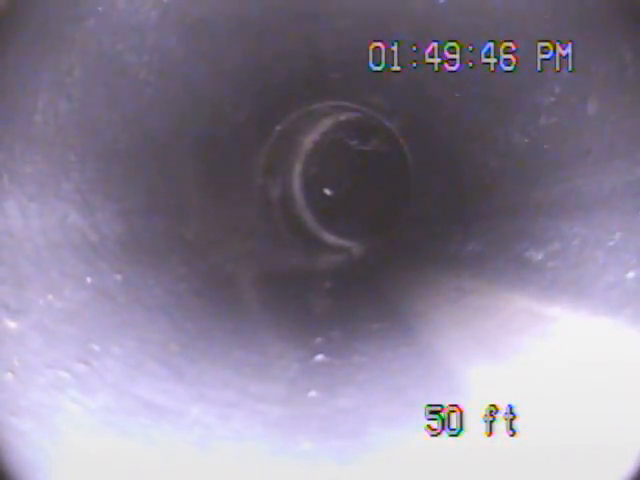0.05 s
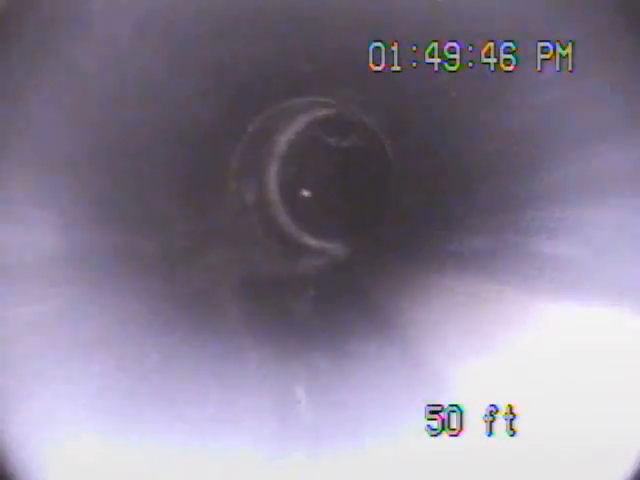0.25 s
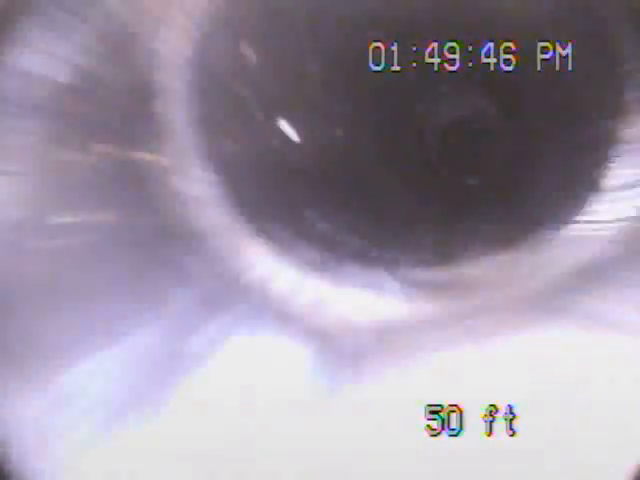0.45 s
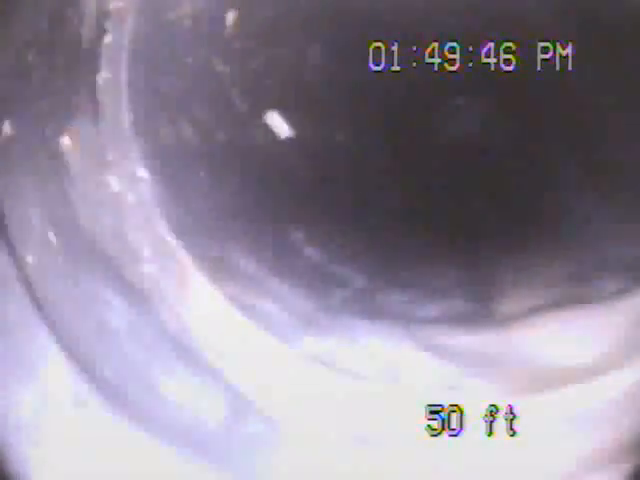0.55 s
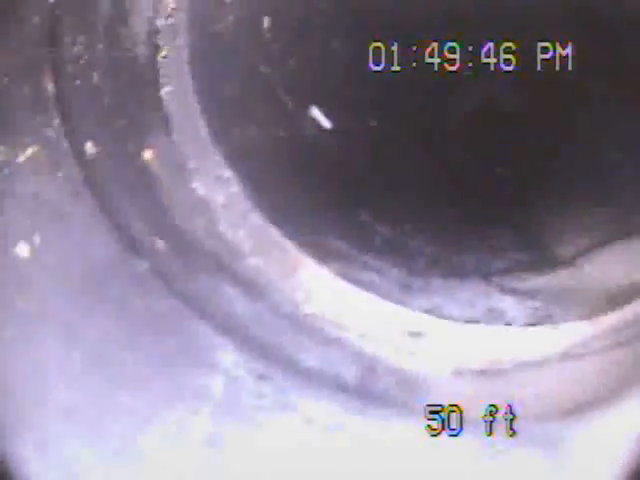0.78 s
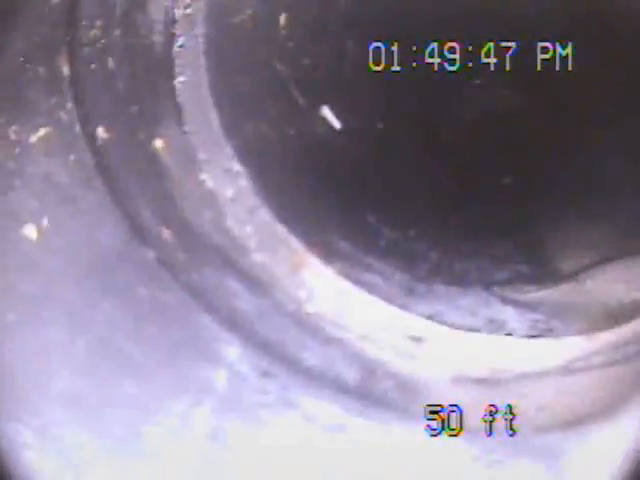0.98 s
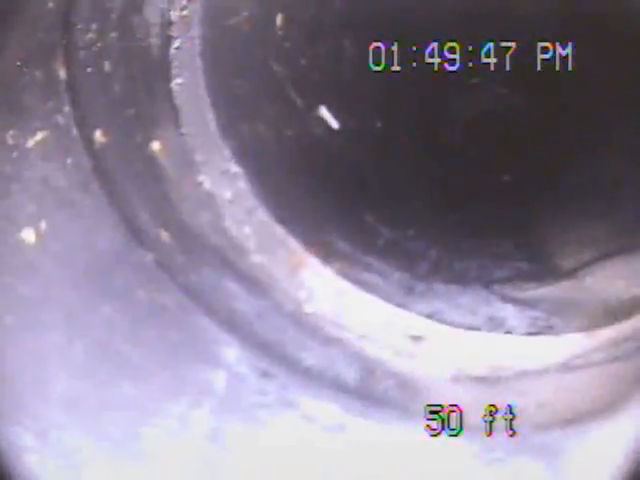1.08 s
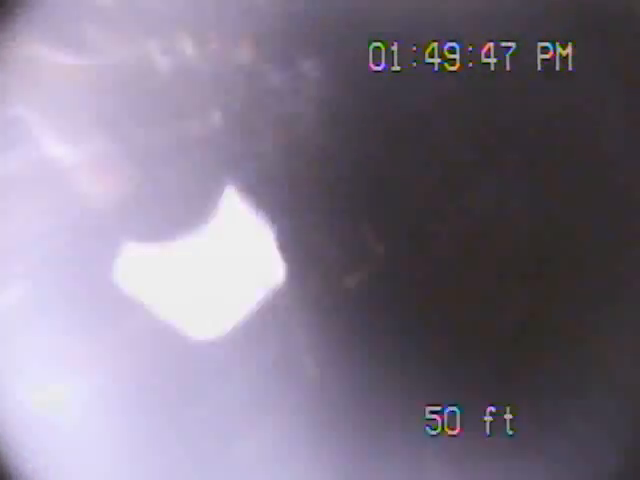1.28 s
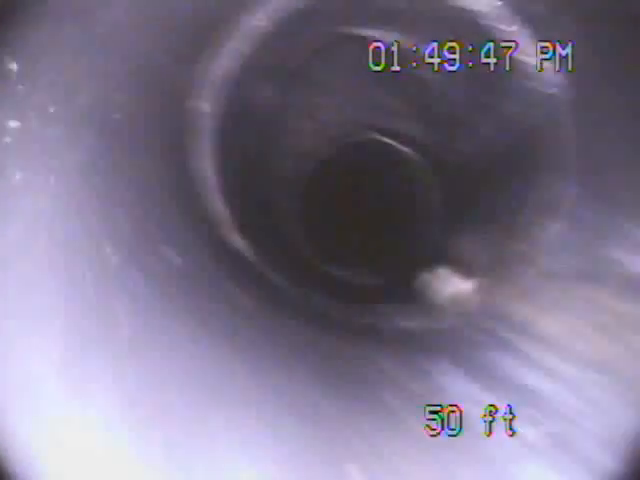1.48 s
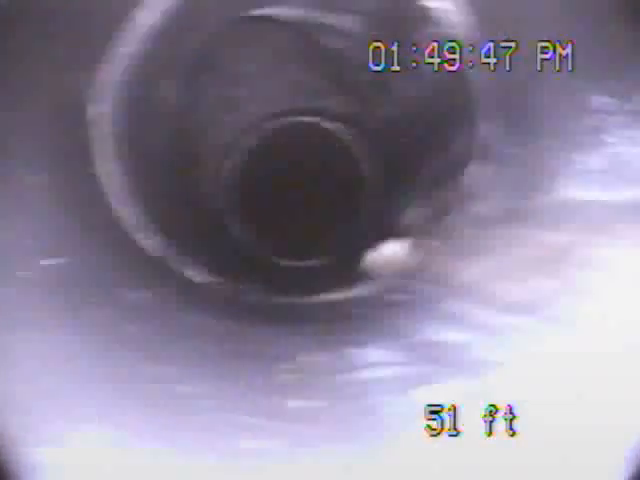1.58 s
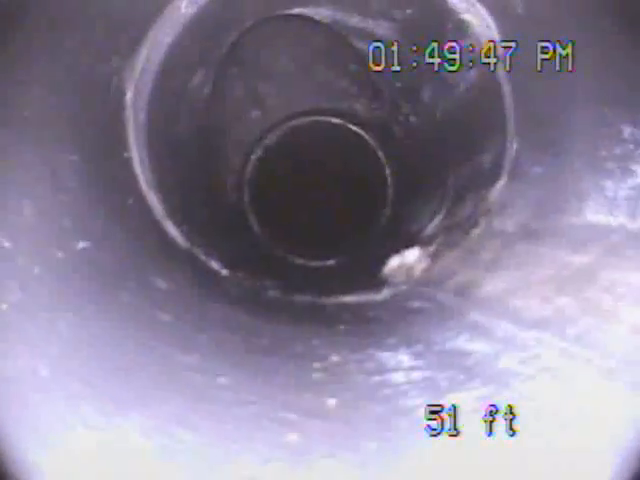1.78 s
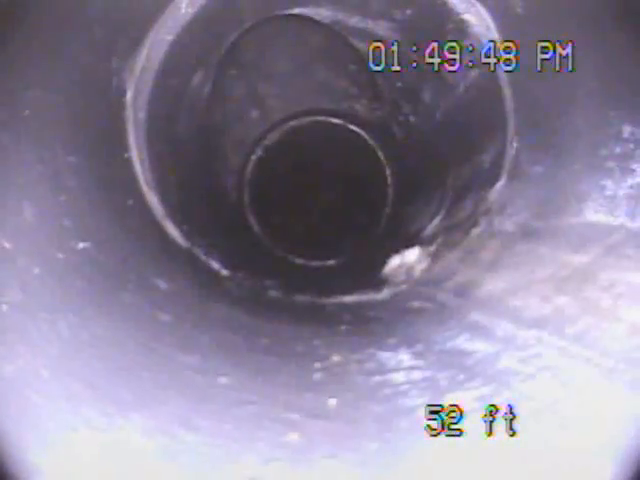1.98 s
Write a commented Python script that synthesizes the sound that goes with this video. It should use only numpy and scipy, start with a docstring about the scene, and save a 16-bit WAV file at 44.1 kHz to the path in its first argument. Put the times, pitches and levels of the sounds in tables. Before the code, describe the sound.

A springy cable slaps against its steel reel in uneven bursts, leaving the bars ringing briefly. Between the slaps, close to the microphone, it hisses into a drain while the reel rumbles and knocks over a faint room drone.

```python
"""Hiss and light metal slaps, close to a stereo microphone: a springy push cable is fed by hand
from its steel reel down a drain. Each slap on the cage chirps downward, as waves spread in the
coil, and leaves the bars ringing. The reel rumbles, with a few dull knocks, and a low thump sits
under the hardest slap. Behind it are room air, a low drone and a monitor's faint whine.
The hardest slaps overload the recorder."""
import sys
import numpy as np
from scipy import signal
from scipy.fft import rfft, irfft
from scipy.io import wavfile

SR = 44100
rng = np.random.default_rng(int(sys.argv[2]) if len(sys.argv) > 2 else 0)


def dump_mix(stems):
    """Bounce the given channels to the path in sys.argv[1] as a 16-bit WAV at rate SR."""
    frames = np.atleast_2d(stems).T  # one column per channel
    limited = np.clip(frames, -1, 1)  # hard clip at full scale
    pcm = np.round(limited * 32767).astype(np.int16)
    wavfile.write(sys.argv[1], SR, pcm)


N = 90404

# still air of the room: frequency_hz, density_db
AIR_COLOUR = [(20, -9.5), (90, -7.5), (170, -18), (400, -13.5), (1000, -23), (3000, -28), (8000, -25),
              (15500, -31.5)]
# crack of cable on steel: frequency_hz, density_db
CRACK_COLOUR = [(40, -39), (180, -31), (400, -30), (1100, -18), (1500, -0.5), (2300, -3.5), (3700, 4),
                (5000, -1), (7500, -6), (15500, -26.5)]
SLAP_RISE_S, SLAP_FALL_S = 0.0009, 0.0022


def undb(db):
    return 10 ** (np.asarray(db) / 20)


def unit(x):
    return x / np.sqrt(np.mean(x ** 2))


def on_log_axis(hz, points, values):
    """Straight lines between points on a log-frequency axis."""
    return np.interp(np.log(hz + 1), np.log(points), values)


def noise(colour):
    """Unit noise shaped by (frequency_hz, density_db) points."""
    gain = undb(on_log_axis(np.fft.rfftfreq(N, 1 / SR), *np.array(colour).T))
    return unit(irfft(rfft(rng.standard_normal(N)) * gain, N))


def wander(seconds):
    """Smooth unit noise that changes in about the given time."""
    hz = np.fft.rfftfreq(N, 1 / SR)
    return unit(irfft(rfft(rng.standard_normal(N)) / (1 + (2 * hz * seconds) ** 2) ** 2, N))


def level_curve(points):
    """Level in dB at every sample, from (time_s, level_db) points."""
    return np.interp(np.arange(N) / SR, *np.array(points).T)


def fade(t, t60):
    return np.exp(-np.log(1000) * t / t60)


def ring(modes, t):
    """Decaying modes with random phases, as if struck at a new spot each time."""
    return sum(undb(db) * fade(t, t60) * np.sin(2 * np.pi * (hz * t + rng.random()))
               for hz, db, t60 in modes)


def add(out, start_s, sound):
    """Mix a sound in at its time."""
    i = int(round(start_s * SR))
    sound = sound[max(-i, 0):max(N - i, 0)]
    out[max(i, 0):max(i, 0) + len(sound)] += sound


def piece(x, size):
    """A random stretch of a long noise, or the same stretch of several bands."""
    i = int(rng.random() * (N - size))
    return x[..., i:i + size]


def room_tone():
    """Still air and a low drone that swells in the second half."""
    drone_level = [(.8, -57.5), (2.05, -45.5)]  # time_s, level_db
    drone_colour = [(25, -19.5), (108, 8), (160, -7), (400, -33)]  # frequency_hz, density_db
    drone = noise(drone_colour) * undb(level_curve(drone_level))
    return undb(-50.5) * noise(AIR_COLOUR) + drone


def monitor_whine():
    """Two thin, high tones from the monitor, each wavering in pitch."""
    tones = [(11770, -63, 50), (15735, -56, 8)]  # pitch_hz, level_db, width_hz
    t = np.arange(N) / SR
    out = np.zeros(N)
    for hz, db, width_hz in tones:
        drift = np.cumsum(width_hz / 2 * wander(1 / width_hz)) / SR
        out += undb(db) * np.sqrt(2) * np.sin(2 * np.pi * (hz * t + drift))
    return out


def room_reverb(x, t60_s):
    """The room answers with a diffuse tail of unit energy."""
    tail = rng.standard_normal(SR) * fade(np.arange(SR) / SR, t60_s)
    return signal.fftconvolve(x, tail / np.sqrt(np.sum(tail ** 2)))[:N]


def reel_rumble():
    """The reel rumbles unevenly as it turns."""
    turning = [(0, -40.5), (.2, -37.5), (.4, -52.5), (.56, -38.5), (.7, -57), (1.0, -62), (1.15, -40),
               (1.45, -47), (1.58, -39), (1.75, -55), (1.85, -44), (1.99, -43.5), (2.02, -36)]  # time_s, level_db
    rumble_colour = [(60, -29), (200, -0.5), (400, -6), (680, -1), (900, -7), (1600, -6), (2500, -12),
                     (6000, -29.5)]  # frequency_hz, density_db
    rough_db = 3.0 * wander(seconds=0.024)
    return noise(rumble_colour) * undb(level_curve(turning) + rough_db)


def cable_hiss():
    """The cable rubs grainily through its guide."""
    sliding = [(0, -33), (.07, -62), (.11, -35.5), (.16, -29), (.23, -26), (.32, -37), (.44, -57),
               (.74, -50.5), (.9, -71), (1.01, -51.5), (1.05, -32.5), (1.19, -25.5), (1.27, -32.5),
               (1.33, -45), (1.41, -65), (1.77, -47), (1.98, -54), (2.05, -40.5)]  # time_s, level_db
    hiss_colour = [(200, -16), (650, -18), (1200, -8), (2250, -10), (3400, 2), (4600, 2), (6500, -5),
                   (9000, -14.5), (15500, -22.5)]  # frequency_hz, density_db
    grain_db = 1.5 * wander(seconds=0.0053)
    return noise(hiss_colour) * undb(level_curve(sliding) + grain_db)


def knocks_and_thump():
    """Dull knocks, and a low thump under the hardest slap: modes near each pitch ring, with a tick."""
    knocks = [(0.104, -28, 1150, -7.5), (0.240, -24, 125, -23), (0.412, -24.5, 1120, -30),
              (1.206, -19, 520, -22), (1.872, -24, 577, -19), (1.899, -24, 604, -6.5),
              (1.902, -21, 640, -25), (1.999, -21, 360, -37)]  # start_s, gain_db, pitch_hz, tick_db
    dull_modes = [(125, -19.5, 0.45), (325.4, -8, 0.17), (542, -2.5, 0.064), (679, 1, 0.053),
                  (1130, 1, 0.046)]  # pitch_hz, gain_db, t60_s
    focus_db_per_octave, tick_s = 11.5, 0.013
    t = np.arange(SR // 4) / SR
    out, crack = np.zeros(N), noise(CRACK_COLOUR)
    for start_s, db, pitch_hz, tick_db in knocks:
        modes = [(hz, mode_db - focus_db_per_octave * abs(np.log2(hz / pitch_hz)), t60)
                 for hz, mode_db, t60 in dull_modes]
        thud = ring(modes, t)
        tick = undb(tick_db) * piece(crack, len(t)) * np.exp(-t / tick_s)
        add(out, start_s, undb(db) * (thud + tick))
    return out


def coil_bands(t):
    """The dense ring of coil and bars: overlapping noise bands, and the decay of each over t."""
    coil = [(50.6, -31.5, .25), (190, -10, 0.23), (327, -21, 0.25), (654, -12, 0.36), (1100, -5, 0.13),
            (1360, -18, 0.33), (1880, -3.5, 0.12), (2240, -16.5, 0.27), (3100, 0.5, 0.18), (4170, -4, 0.11),
            (6040, -8.5, 0.14), (15220, -36.5, 0.099)]  # centre_hz, density_db, t60_s
    centres_hz = [row[0] for row in coil]
    hz = np.fft.rfftfreq(N, 1 / SR)
    spectrum = rfft(noise([row[:2] for row in coil]))
    bands = [irfft(spectrum * on_log_axis(hz, centres_hz, share), N) for share in np.eye(len(coil))]
    return np.array(bands), np.array([fade(t, row[2]) for row in coil])


def cage_rattle(t, flutter):
    """The bars ring unsteadily, as the loose cable keeps touching them."""
    cage_modes = [(749, -12.5, 0.59), (1097, -1.5, 0.14), (1382, -18, 0.087), (2626, -4.5, 0.35),
                  (2770, -8, 0.33), (3355, 3, 0.14), (3360, -12, 0.16), (4000, -3.5, 0.14), (4740, 1, 0.14),
                  (5810, -5, 0.18)]  # pitch_hz, gain_db, t60_s
    return sum(ring([mode], t) * piece(flutter, len(t)) for mode in cage_modes)


def coil_chirps(t, pitch_hz, waver):
    """Waves spread in the coil: branches arrive in turn and fall, the middle one from pitch_hz."""
    branches = [(752, -21, 0.02, 0.003), (2714, -3, 0.01, 0), (5620, -14.5, 0.013, 0.007)]  # final_hz, gain_db, decay_s, arrival_s
    glide_s, waver_depth = 0.0085, 0.025
    excess = pitch_hz / branches[1][0] - 1
    glide = 1 + excess * np.exp(-np.maximum(t, 0) / glide_s)
    out = np.zeros(len(t))
    for final_hz, db, decay_s, arrival_s in branches:
        age = np.maximum(t - arrival_s, 0)
        hz = final_hz * glide * (1 + waver_depth * piece(waver, len(t)))
        swell = np.exp(np.minimum(t - arrival_s, 0) / SLAP_RISE_S - age / decay_s)
        out += undb(db) * swell * np.sin(2 * np.pi * (np.cumsum(hz) / SR + rng.random()))
    return out


def tilt(x, brightness_db):
    """Harder contacts are brighter, softer ones duller; the bass stays as it is."""
    hz = np.fft.rfftfreq(len(x), 1 / SR)
    weight = on_log_axis(hz, [300, 1000, 2800, 12000], [0, -1.5, 0, 2.1])
    return irfft(rfft(x) * undb(brightness_db * weight), len(x))


def bite(x, pitch_hz, peak_db=11, half_width_octaves=0.13):
    """The spot that is struck lifts the crack around one pitch."""
    octaves = np.log2((np.fft.rfftfreq(len(x), 1 / SR) + 1) / pitch_hz)
    return irfft(rfft(x) * undb(peak_db / (1 + (octaves / half_width_octaves) ** 2)), len(x))


def cable_slaps():
    """The cable hits the cage: a dull forerunner, a pitched crack, chirps, then ringing steel."""
    slaps = [(0.003, -33.5, -4.5, 9, 3234), (0.028, -25.5, -5.5, -3, 3210), (0.083, -26.5, -5.5, 0.5, 3485),
             (0.195, -24.5, -5, 7, 3277), (0.237, -4, -6, -16, 4400), (0.2419, 3.5, -1, -7, 4443),
             (0.247, -10, 7, -1, 3260), (0.2578, -0.5, 1.5, -3.5, 3309), (0.261, -5, 3.5, -5, 3380),
             (0.266, 0.5, -2, -13, 3664), (0.276, -18, 2.5, -8, 2920), (0.325, -18.5, -4.5, -12, 3600),
             (0.387, -15.5, -2.5, -7.5, 3700), (0.458, -30, -13, -15, 3900), (0.477, -27.5, -2.5, 6, 4090),
             (0.521, -22, -0.5, 5, 3260), (0.526, -21, -1, 3, 3290), (0.541, -21, -1, -0.5, 3236),
             (1.169, -25.5, 1, 9, 3483), (1.2014, -6.5, -4.5, -11.5, 3066), (1.2043, 2.5, 2.5, -10.5, 3362),
             (1.22, -20.5, -1, -8.5, 3250), (1.429, -26.5, -6.5, -4, 5410), (1.4717, -19, 0, -11.5, 4040),
             (1.4917, -3, 1.5, -10, 3950), (1.505, -18.5, 0, 6, 3510), (1.544, -15, 0.5, 0, 3993),
             (1.674, -26, -4.5, -1.5, 3820)]  # start_s, gain_db, brightness_db, ring_db, pitch_hz
    size, margin_s, lead_s = 16384, 0.008, 0.0015
    ping_db, ping_t60_s = -17, 0.24
    t = np.arange(size) / SR - margin_s
    age = np.maximum(t, 0)
    rise = np.exp(np.minimum(t, 0) / SLAP_RISE_S)
    lead = (t > -lead_s) * np.exp(-np.abs(t + lead_s) / SLAP_FALL_S)
    contact, waver = noise(CRACK_COLOUR), wander(seconds=0.001)
    bands, decays = coil_bands(age)
    dull, flutter = tilt(contact, brightness_db=-1.5), wander(seconds=0.01)
    out = np.zeros(N)
    for start_s, db, brightness_db, ring_db, pitch_hz in slaps:
        crack = undb(-5.5) * bite(piece(contact, size), pitch_hz) * np.exp(-age / SLAP_FALL_S)
        coil = undb(-5) * np.sum(piece(bands, size) * decays, axis=0)
        cage = undb(-14.5) * cage_rattle(age, flutter)
        ping = ring([(pitch_hz, ping_db, ping_t60_s)], age)  # the struck spot rings on
        forerunner = undb(-5.5) * lead * piece(dull, size)
        chirps = undb(0.73 * ring_db) * coil_chirps(t, pitch_hz, waver)  # partly follow the ring's level
        slap = forerunner + rise * (crack + undb(ring_db) * (coil + cage + ping)) + chirps
        add(out, start_s - margin_s, undb(db) * tilt(slap, brightness_db))
    return out


def scene():
    """Two capsules close to the reel: the left is a touch later and louder; each adds its own air."""
    left_lag_s, balance_db = 22e-6, 0.4
    reel = cable_slaps() + knocks_and_thump() + cable_hiss() + reel_rumble()
    mix = reel + undb(-25) * room_reverb(reel, t60_s=1) + monitor_whine() + room_tone()
    delay = np.exp(-2j * np.pi * np.fft.rfftfreq(N, 1 / SR) * left_lag_s)
    left = irfft(rfft(mix) * delay, N) * undb(balance_db / 2)
    right = mix * undb(-balance_db / 2)
    return np.array([side + undb(-72.5) * noise(AIR_COLOUR) for side in (left, right)])


def record(dry):
    """The recorder flattens peaks at full scale and cuts the top."""
    knee, top_hz = 4.5, 15900
    clipped = dry / (1 + np.abs(dry) ** knee) ** (1 / knee)
    return signal.sosfilt(signal.ellip(10, .1, 70, top_hz, fs=SR, output="sos"), clipped)


dry = scene()
out = record(dry)
dump_mix(out)
```